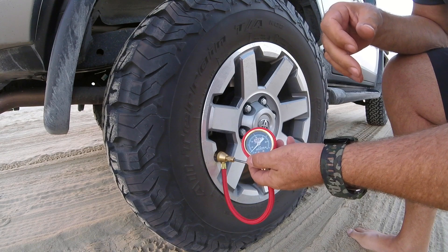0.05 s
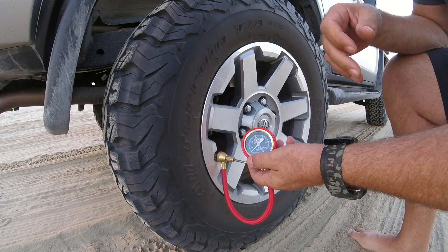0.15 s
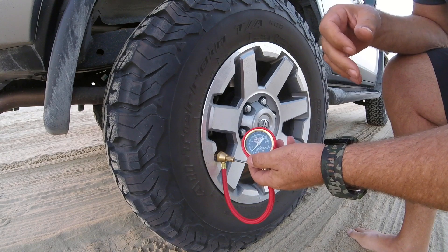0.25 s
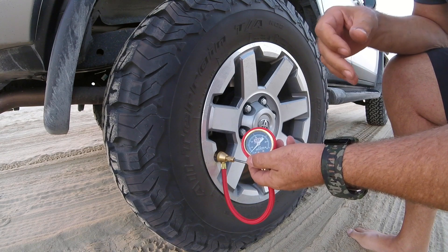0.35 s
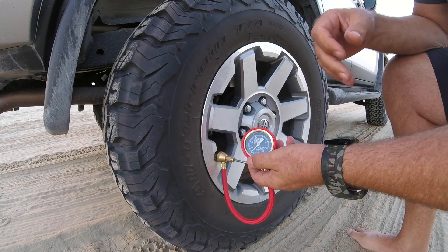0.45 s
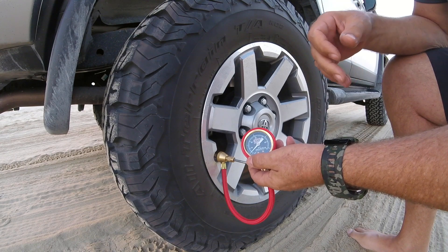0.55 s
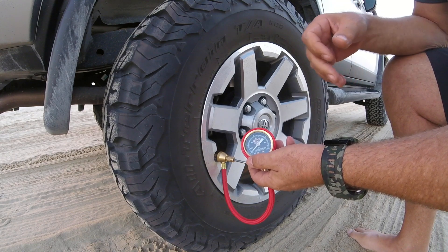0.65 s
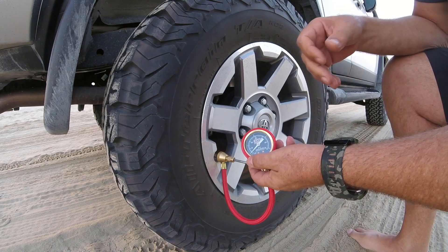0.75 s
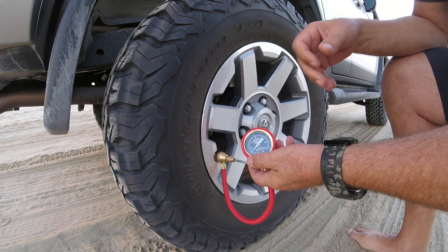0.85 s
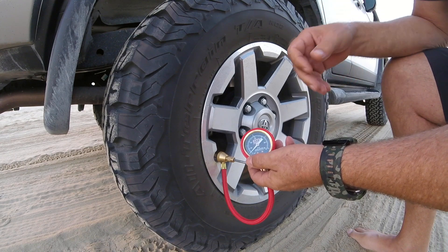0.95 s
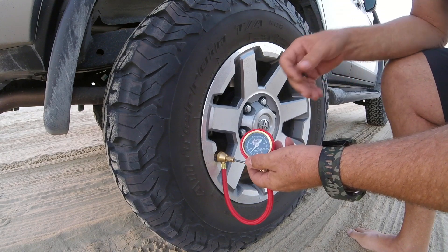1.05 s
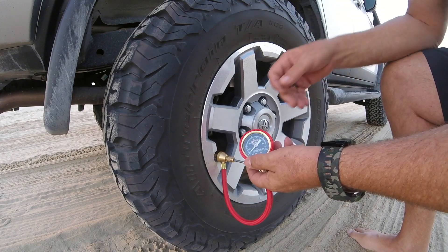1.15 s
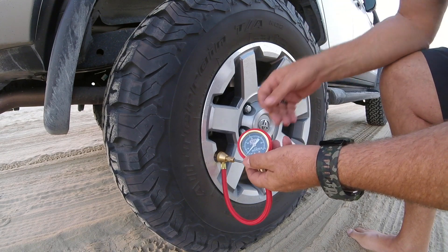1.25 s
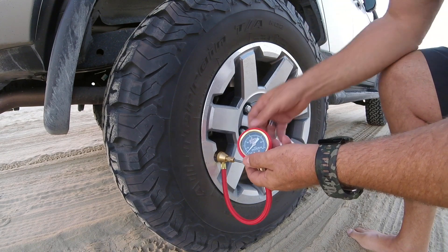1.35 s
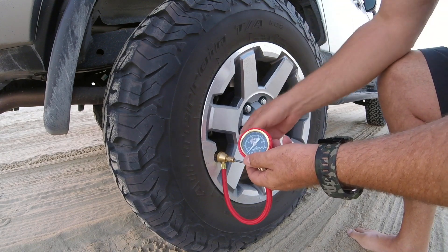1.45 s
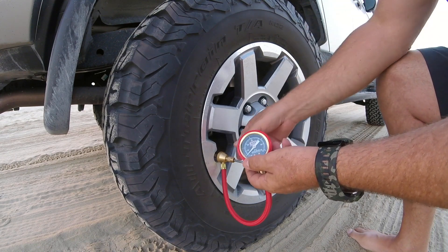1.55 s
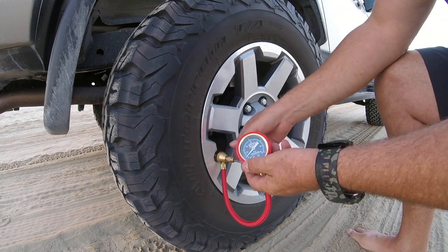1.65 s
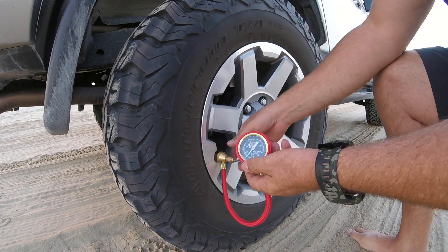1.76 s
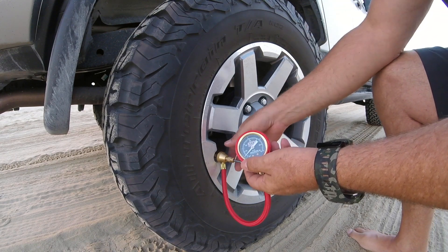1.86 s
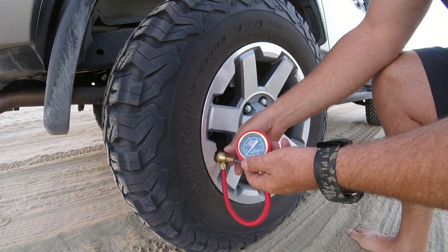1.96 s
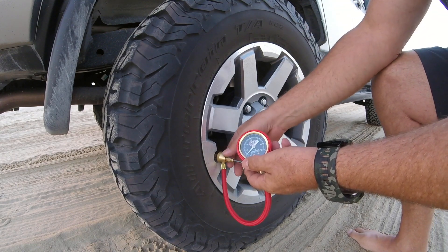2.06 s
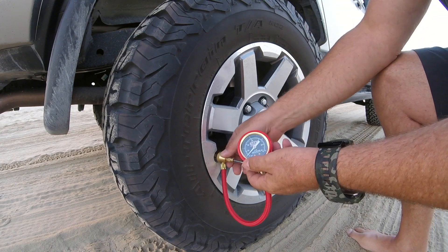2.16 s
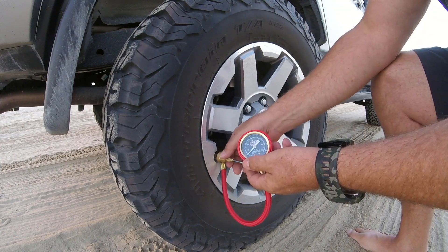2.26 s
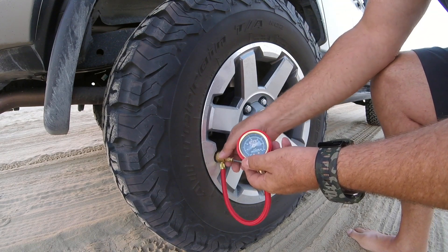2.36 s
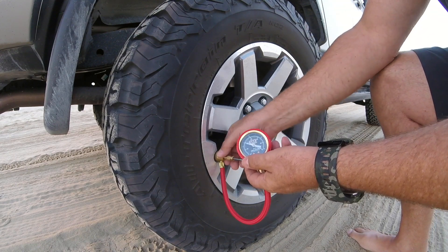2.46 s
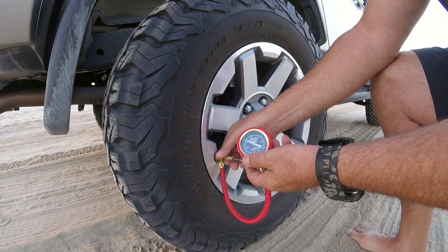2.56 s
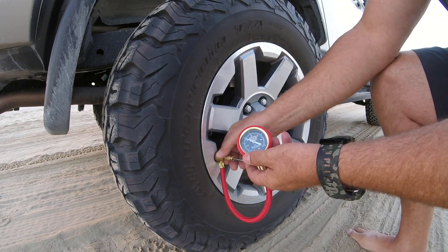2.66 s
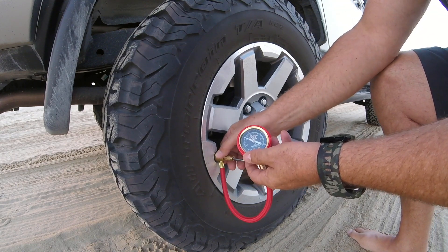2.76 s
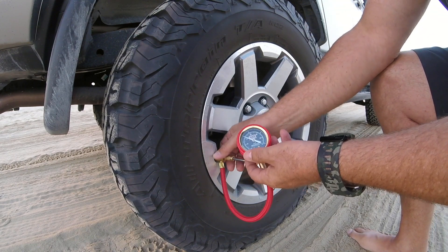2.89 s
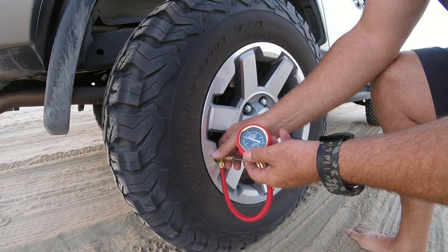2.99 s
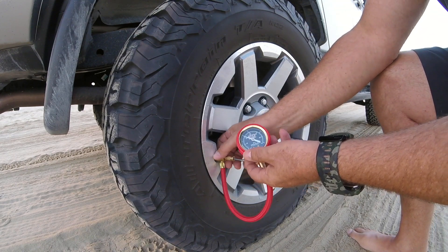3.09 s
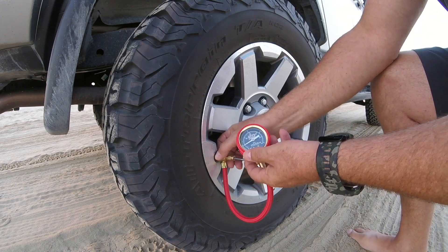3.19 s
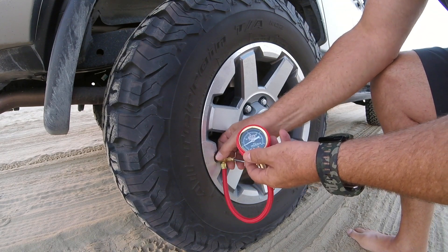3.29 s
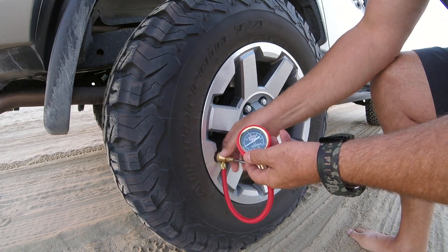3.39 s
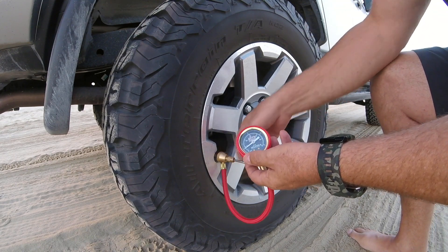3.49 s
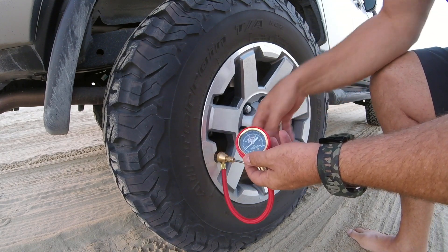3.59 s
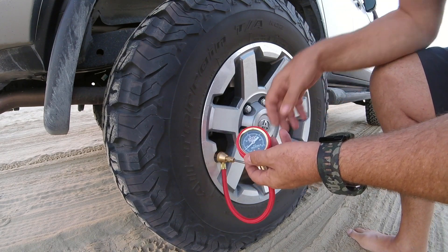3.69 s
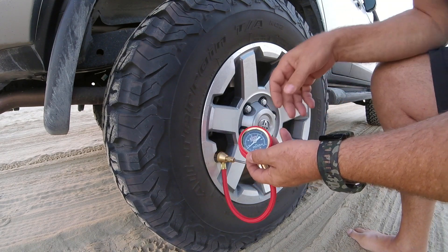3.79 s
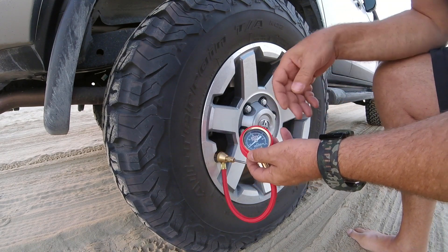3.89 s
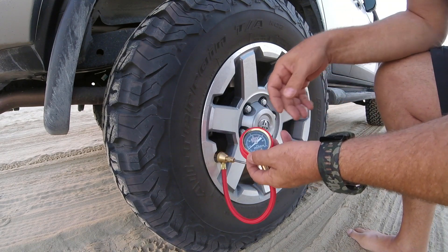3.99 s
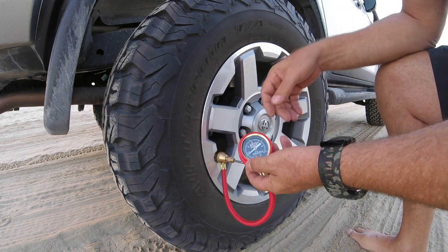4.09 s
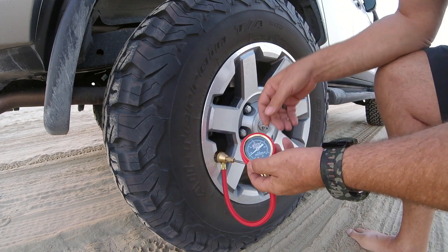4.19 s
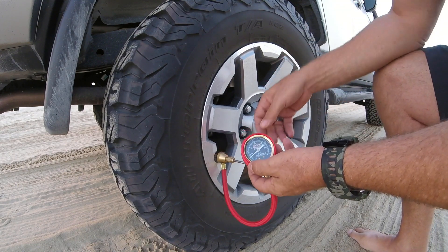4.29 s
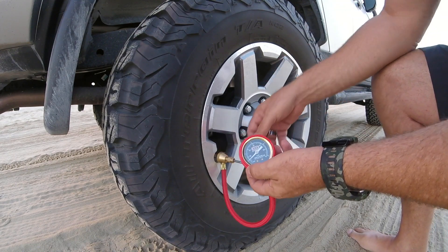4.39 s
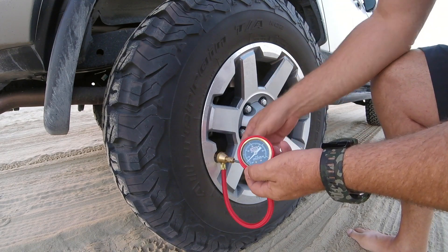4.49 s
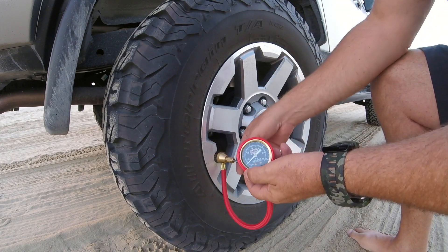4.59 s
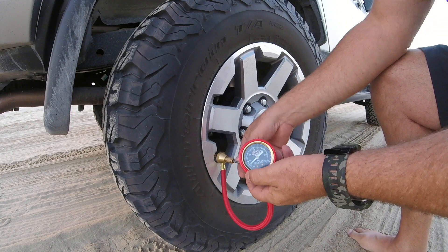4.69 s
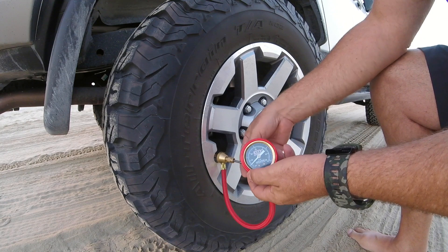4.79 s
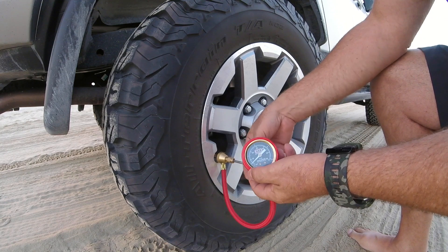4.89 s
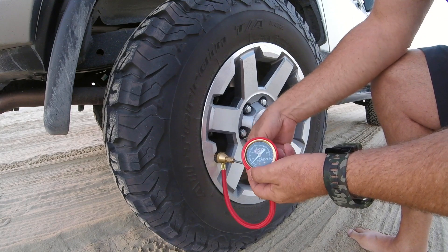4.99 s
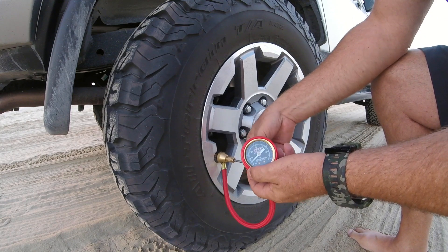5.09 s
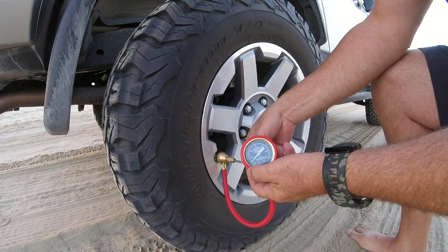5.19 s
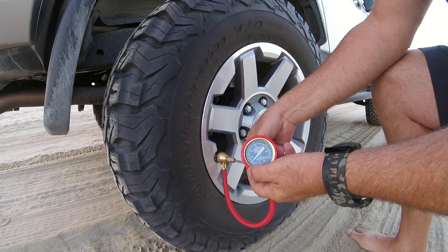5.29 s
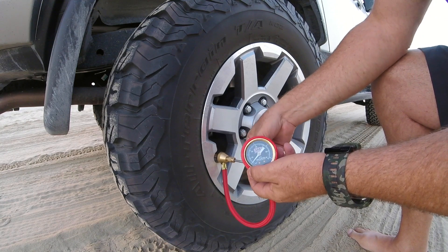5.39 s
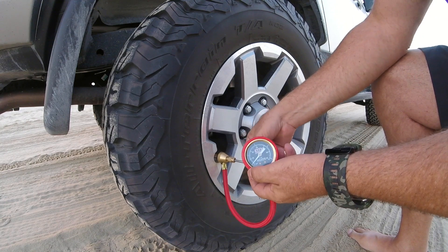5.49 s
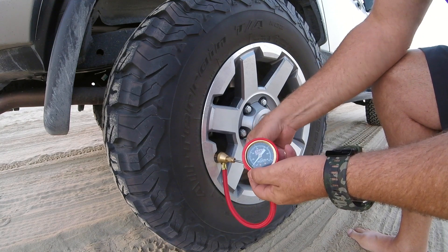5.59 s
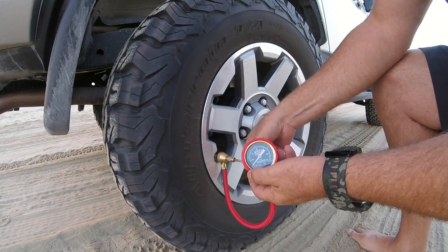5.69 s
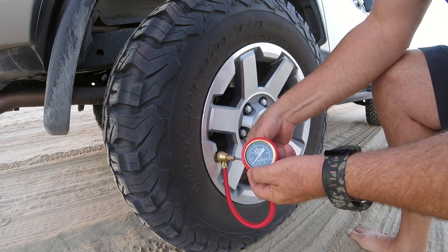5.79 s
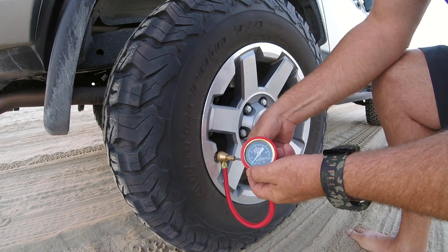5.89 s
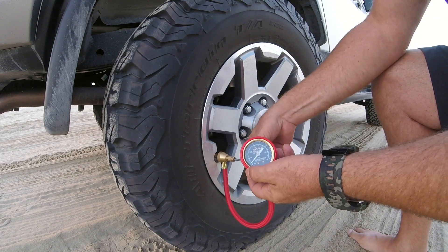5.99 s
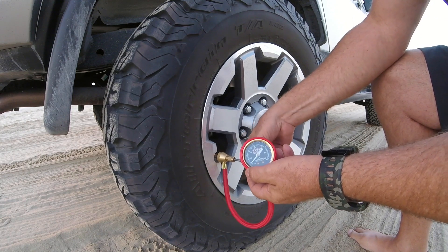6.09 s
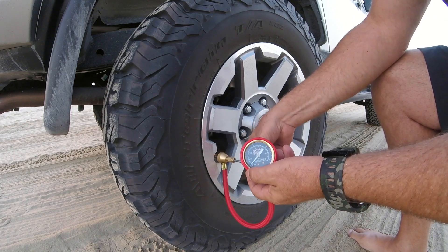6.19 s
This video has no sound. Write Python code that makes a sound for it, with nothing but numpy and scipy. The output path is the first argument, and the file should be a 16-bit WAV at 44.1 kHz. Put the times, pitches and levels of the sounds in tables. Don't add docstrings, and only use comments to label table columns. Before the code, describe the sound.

Steady sharp hiss of a deflating tyre, briefly shut off to near silence with tiny whistles, then reopened as a distant engine revs up.

```python
import sys
import numpy as np
from scipy import signal
from scipy.io import wavfile
from scipy.ndimage import uniform_filter1d, map_coordinates

SR = 44100
rng = np.random.default_rng(int(sys.argv[2]) if len(sys.argv) > 2 else 0)


def dump_mix(stems):
    frames = np.atleast_2d(stems).T
    limited = np.clip(frames, -1, 1)
    pcm = np.round(limited * 32767).astype(np.int16)
    wavfile.write(sys.argv[1], SR, pcm)


def magnitude_from_level(level_db):
    exponent = np.asarray(level_db, float) / 20
    return 10 ** exponent


N = 275625
T = np.arange(N) / SR
SHUT_S, OPEN_S = 2.437, 3.189


def in_time(rows, t=T):
    s, *columns = np.transpose(rows)
    return [np.interp(t, s, c) for c in columns]


def at_hz(points, hz):
    point_hz, point_db = np.transpose(points)
    return np.interp(np.log(hz + 1), np.log(point_hz), point_db)


def drift(rate_hz):
    knots = rng.standard_normal(400)
    return map_coordinates(knots, [T * rate_hz * 2], order=3, mode="wrap")


def patches(shape, frames, bins):
    field = rng.standard_normal(shape)
    for _ in range(2):
        field = uniform_filter1d(field, size=bins, axis=0)
        field = uniform_filter1d(field, size=frames, axis=1)
    return field / field.std()


def noise(colour_db):
    hz, s, frames = signal.stft(rng.standard_normal(N), SR, nperseg=1024, noverlap=768)
    coloured = frames * magnitude_from_level(colour_db(hz[:, None], s))
    out = signal.istft(coloured, SR, nperseg=1024, noverlap=768)[1][:N]
    return out / out.std()


# hz, level_db_per_hz
TURBULENCE = [(250, -33), (450, -38.5), (900, -32), (1300, -26.5), (2100, -25.5), (4200, -24.5),
              (5100, -11), (6550, -9), (6850, -19.5), (8400, -20), (10400, -24.5), (11600, -37),
              (12500, -29), (14000, -36)]


def fitting_db(modes, hz):
    tops = sum(magnitude_from_level(2 * db) / (1 + (2 * (hz - mode_hz) / width_hz) ** 2) ** 1.53
               for mode_hz, width_hz, db in modes)
    return 10 * np.log10(magnitude_from_level(2 * at_hz(TURBULENCE, hz)) + tops)


# time_s, level_db
FLOW = [(0, -24.5), (.3, -24), (.7, -24), (1.2, -22.5), (1.65, -25), (2.0, -23.5), (2.43, -24.5),
        (3.22, -23.5), (3.5, -23.5), (4.15, -24.5), (4.6, -25.5), (4.95, -25.5), (5.5, -24), (5.85, -25),
        (6.25, -24)]
# centre_hz, width_hz, level_db
FREE_MODES = [(616, 150, -26), (1750, 260, -21), (2750, 500, -10), (3474, 260, -10.5), (4500, 200, -46.5),
              (5650, 260, 2.5), (6120, 130, -13), (6435, 236, -3), (7050, 150, -15), (7870, 150, -15),
              (8730, 230, -14), (9620, 220, -17), (10200, 180, -24.5), (10720, 150, -21),
              (11420, 250, -28.5), (13100, 250, -34), (13260, 150, -27.5)]
# centre_hz, width_hz, level_db
SHADED_MODES = [(668, 155, -22.5), (1188, 110, -29), (1425, 54, -23.5), (1750, 150, -22.5),
                (3000, 1090, -19.5), (3380, 110, -21), (3980, 210, -18), (5610, 350, -0.5),
                (6040, 280, -1.5), (6400, 130, -1), (7000, 160, -9.5), (7620, 150, -13), (8600, 300, -32),
                (10250, 190, -21), (10400, 150, -28), (13100, 252, -26), (13460, 150, -21.5)]
# time_s, shading (0-1)
HAND = [(0, .05), (.9, 0.06), (1.3, 0.26), (2.0, 0.3), (2.45, 0.6), (3.2, .82), (3.4, .88), (4.5, 0.85),
        (6.25, 0.66)]


def jet():
    shut_db_per_s, open_rise_s, open_curve = 1508, 0.02, 1.38

    def colour_db(hz, s):
        shade = np.clip(in_time(HAND, s)[0], 0, 1.2)
        treble_db = -0.4 + shade * (-0.13 + 0.4)
        low_hiss_db = 1.1 + shade * (-0.64 - 1.1)
        still = (1 - shade) * fitting_db(FREE_MODES, hz) + shade * fitting_db(SHADED_MODES, hz)
        shape = (len(hz), len(s))
        waver = 0.9 * patches(shape, frames=40, bins=5) + 0.53 * patches(shape, frames=5, bins=30)
        treble = treble_db * np.clip((hz - 6800) / 1000, 0, 1)
        low_hiss = low_hiss_db * np.clip((4700 - hz) / 400, 0, 1)
        return still + waver + treble + low_hiss

    closing = magnitude_from_level(np.minimum(0, shut_db_per_s * (SHUT_S - T)))
    opening = np.clip((T - OPEN_S) / open_rise_s, 0, 1) ** open_curve
    flow = magnitude_from_level(in_time(FLOW)[0] + 0.64 + 0.49 * drift(20))
    return noise(colour_db) * np.maximum(closing, opening) * flow


# start_s, level_db, pitch_hz, width_hz, length_s
LEAKS = [
    (2.452, -72, 5170, 110, .1),
    (2.452, -74, 5900, 1400, .08),
    (2.55, -80, 5200, 1200, .04),
    (2.75, -83, 4400, 300, .03),
    (2.785, -77, 4800, 250, .025),
    (2.77, -78, 3400, 500, .1),
    (3.078, -70, 4950, 400, .03),
    (3.078, -66, 6000, 1500, .022),
]


def leaks():
    out, air = np.zeros(N), rng.standard_normal(N)
    for start_s, level_db, pitch_hz, width_hz, length_s in LEAKS:
        tone = ring(ring(air, pitch_hz, width_hz), pitch_hz, width_hz)
        phase = np.clip((T - start_s) / length_s, 0, 1)
        swell = np.sqrt(np.sin(np.pi * phase ** .6).clip(0))
        out += magnitude_from_level(level_db) * tone / tone.std() * swell
    return out


def ring(x, hz, width_hz):
    r = np.exp(-np.pi * width_hz / SR)
    poles = [1, -2 * r * np.cos(2 * np.pi * hz / SR), r * r]
    return signal.lfilter([(1 - r * r) / 2, 0, (r * r - 1) / 2], poles, x)


# time_s, sixth_order_hz, sixth_order_db
REV = [(0, 102, -56), (.4, 104.5, -56), (2.95, 106, -55), (3.2, 110, -47), (3.6, 124, -38.5),
       (3.9, 121.5, -39), (4.25, 120, -40), (4.7, 121.5, -38.5), (6.25, 126, -38)]
# order, level_db
REV_ORDERS = [(2, -64.5), (4, -66), (5, -62.5), (7, -58.5), (8, -58), (9, -79.5)]
# order, level_db
IDLE_ORDERS = [(3, -56), (4, -67.5), (6, -61), (9, -59.5), (10, -64), (12, -73)]


def engines(lift):
    boom_hz, boom_db = in_time(REV)
    boom = magnitude_from_level(boom_db) * orders(boom_hz, [(0.99, 0.0014)], wobble_db=0.8)
    revved = np.clip((T - 3.19) / .03, 0, 1)
    throb_db = -51 + revved * (-8 + 3.0 * drift(3.5))
    throb_hz = 35.5 * (1 + .01 * drift(3.9))
    throb = magnitude_from_level(throb_db) * orders(throb_hz, [(1, 0.01)], wobble_db=0.5)
    rev = orders(boom_hz / 6, REV_ORDERS, wobble_db=0.5)
    idle_hz = 16.5 * (1 + 0.0028 * drift(2.1))
    idle = orders(idle_hz, IDLE_ORDERS, wobble_db=3.5)
    return boom + lift * (throb + rev + idle)


def orders(shaft_hz, table, wobble_db):
    turn = 2 * np.pi * np.cumsum(shaft_hz) / SR
    out = np.zeros(N)
    for order, level_db in table:
        level = np.sqrt(2) * magnitude_from_level(level_db + wobble_db * drift(2.3))
        out += level * np.sin(order * turn + 7 * rng.random())
    return out


# start_s, level_db, pitch_hz, t60_s
THUMPS = [
    (1.62, -39, 72, 1),
    (1.922, -26.5, 58, 0.3),
    (3.03, -34, 52, 0.57),
    (3.096, -26, 111, 0.23),
    (4.24, -35, 68, 0.49),
    (4.261, -34, 95.8, 1),
    (5.7, -38, 39.4, 0.46),
]


def thumps():
    out = np.zeros(N)
    for start_s, level_db, pitch_hz, t60_s in THUMPS:
        age_s = np.maximum(T - start_s, 0)
        onset = 1 - np.exp(-age_s / 0.027)
        out += magnitude_from_level(level_db - 60 * age_s / t60_s) * onset * np.sin(2 * np.pi * pitch_hz * age_s)
    return out


# hz, level_db_per_hz
FLOOR = [(20, -6.5), (50, -4), (140, -5), (210, -17.5), (400, -19), (600, -30), (1150, -29), (2000, -34.5),
         (3500, -43.5), (4300, -47), (6200, -46), (6550, -39.5), (6900, -44), (11000, -56)]


def floor():
    def colour_db(hz, s):
        return at_hz(FLOOR, hz) + 0.6 * patches((len(hz), len(s)), frames=15, bins=12)
    return magnitude_from_level(-53.5) * noise(colour_db)


def gain_lift():
    lift_db_per_s = 6
    release = np.clip((OPEN_S + 0.013 - T) / 0.044, 0, 1)
    return magnitude_from_level(lift_db_per_s * (T - SHUT_S).clip(0) * release)


def scene():
    lift = gain_lift()
    return (jet() + leaks() + engines(lift) + thumps() + lift * floor())[None]


def top_cut(x):
    return signal.sosfilt(signal.butter(12, 14870, fs=SR, output="sos"), x)


def record(dry):
    cut = signal.sosfilt(signal.butter(2, 22, "high", fs=SR, output="sos"), dry)
    return top_cut(cut)


dry = scene()
out = record(dry)
dump_mix(out)
```